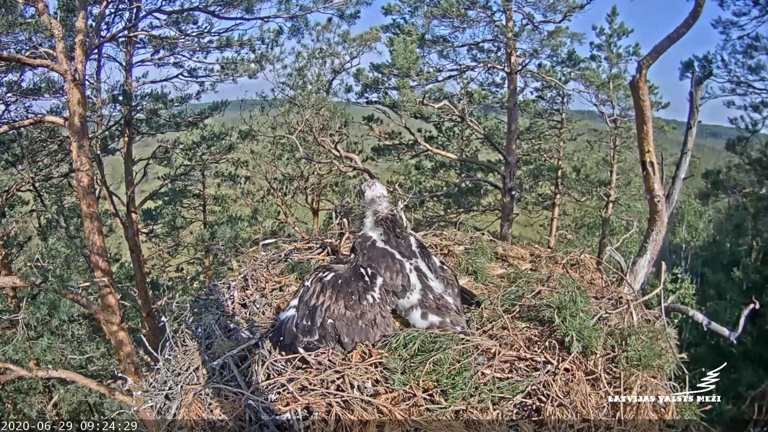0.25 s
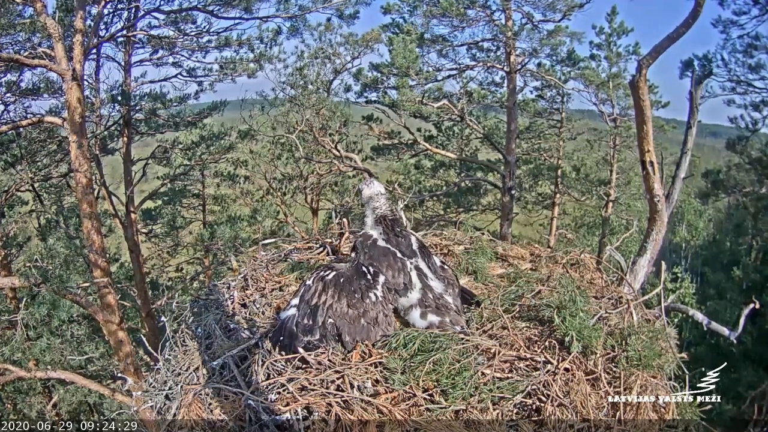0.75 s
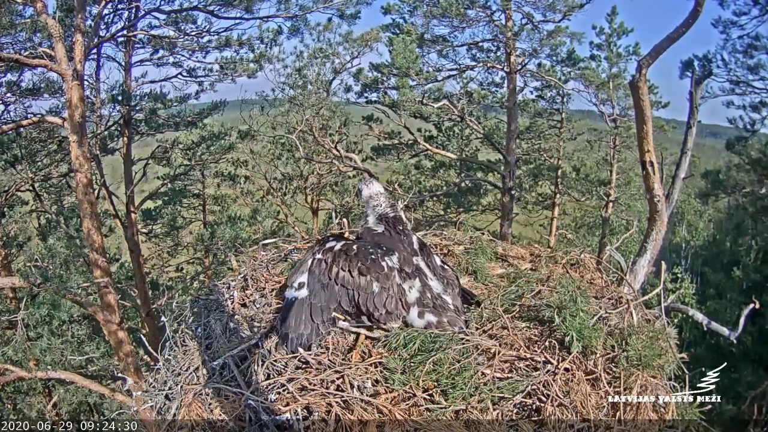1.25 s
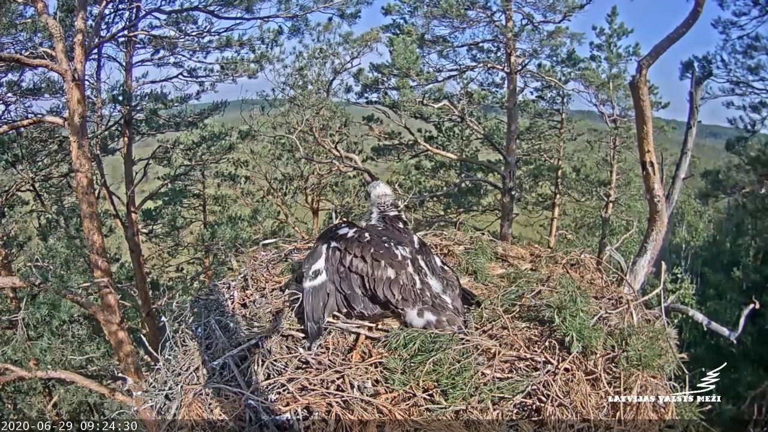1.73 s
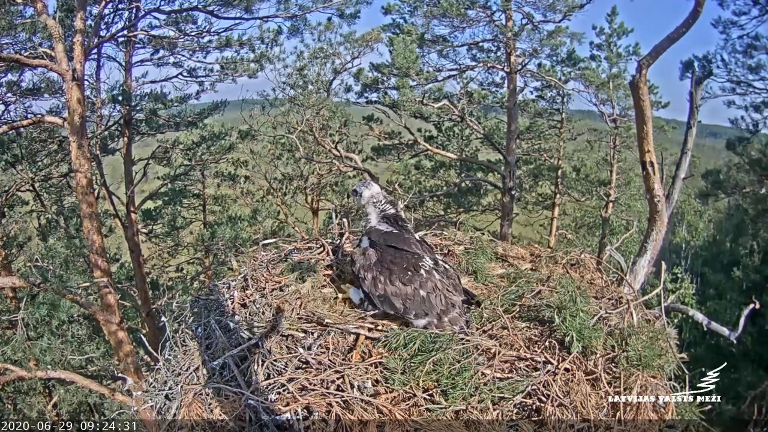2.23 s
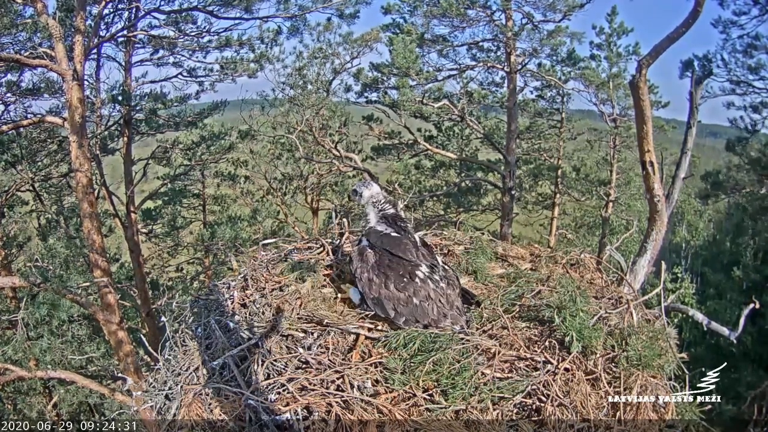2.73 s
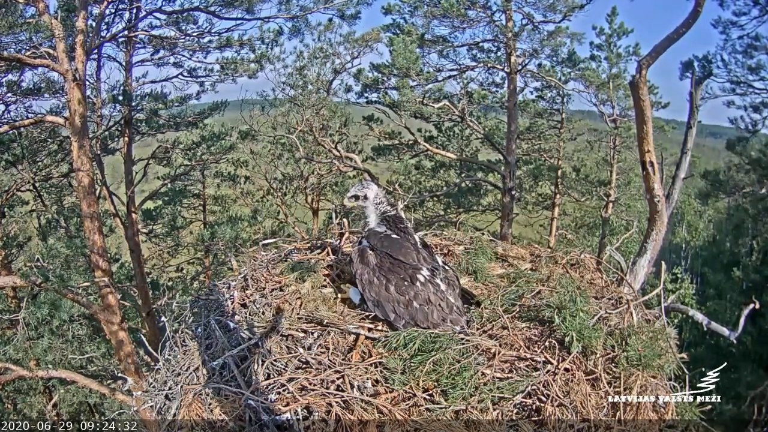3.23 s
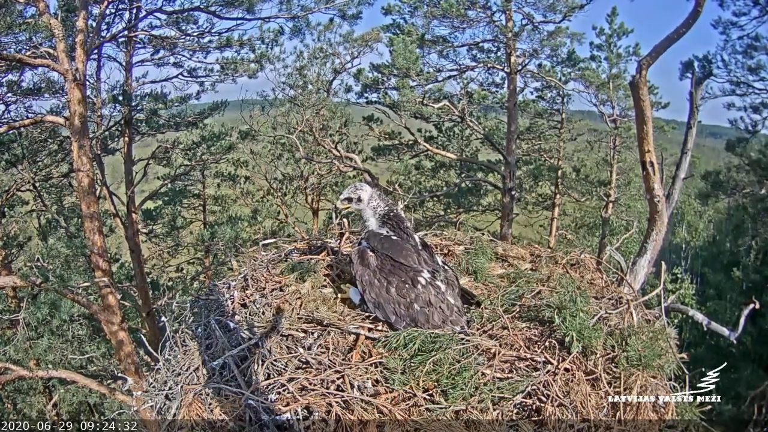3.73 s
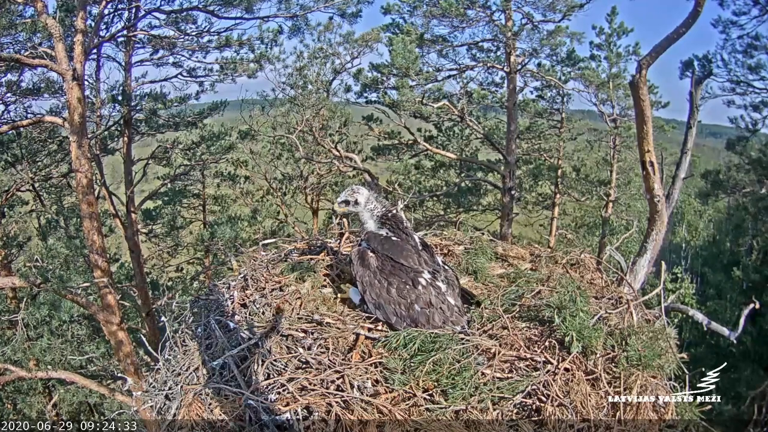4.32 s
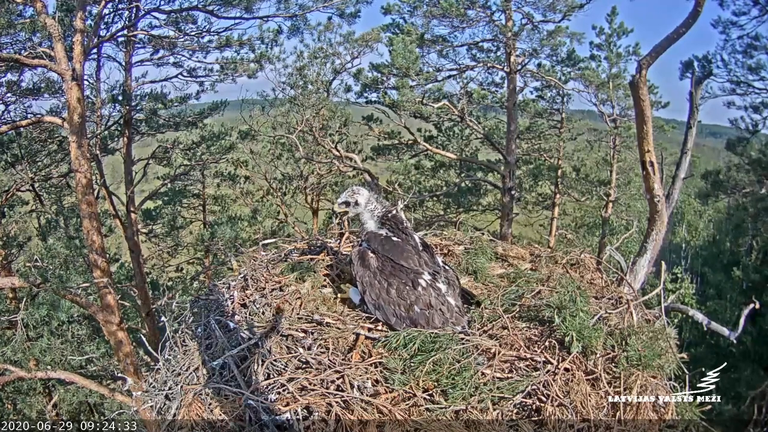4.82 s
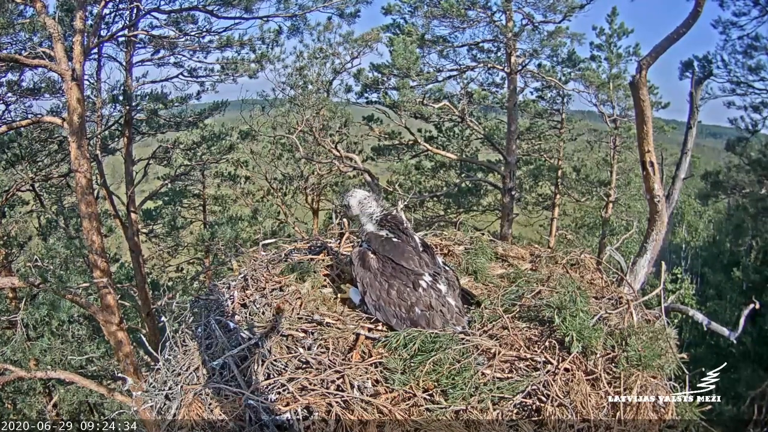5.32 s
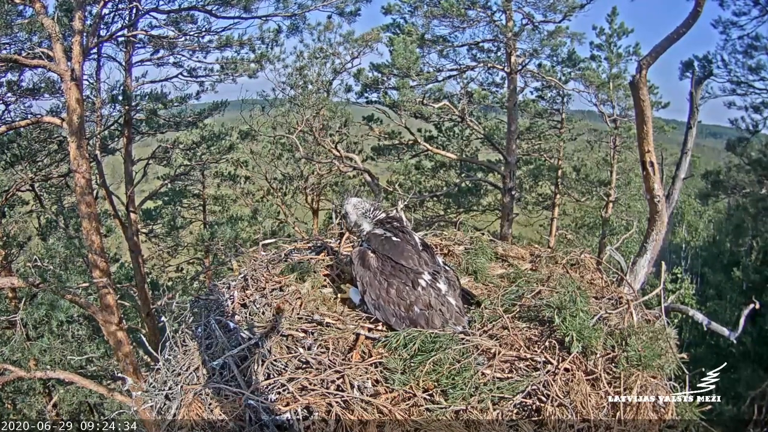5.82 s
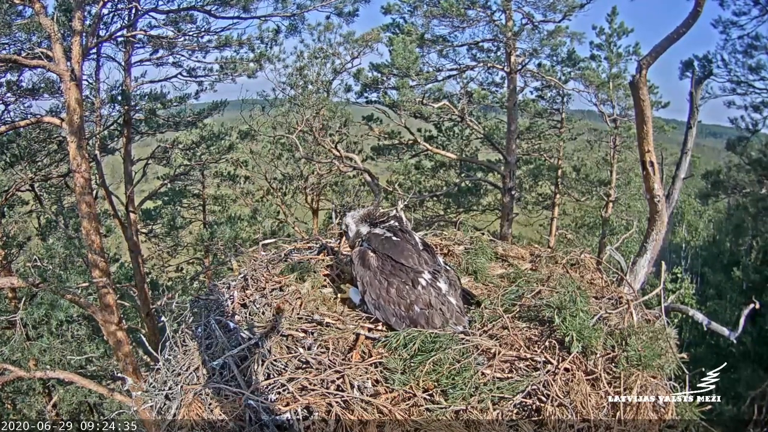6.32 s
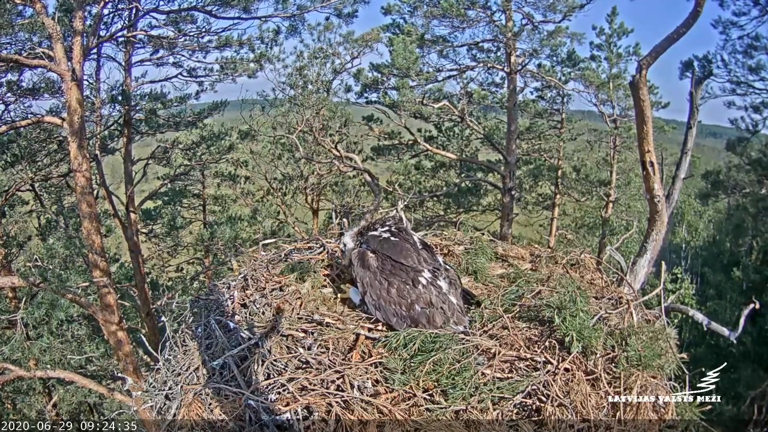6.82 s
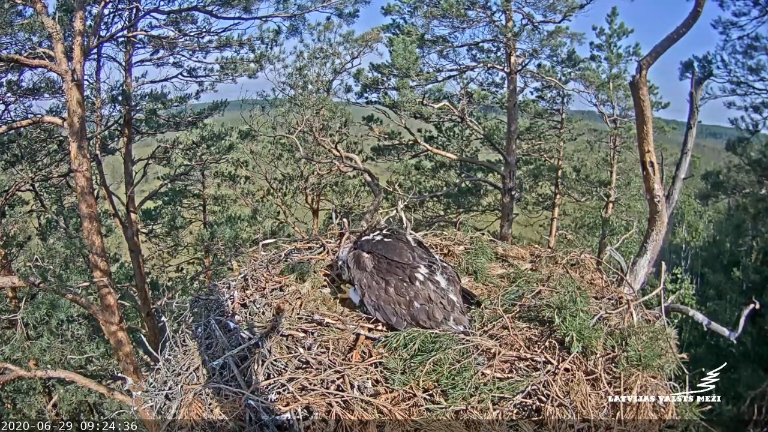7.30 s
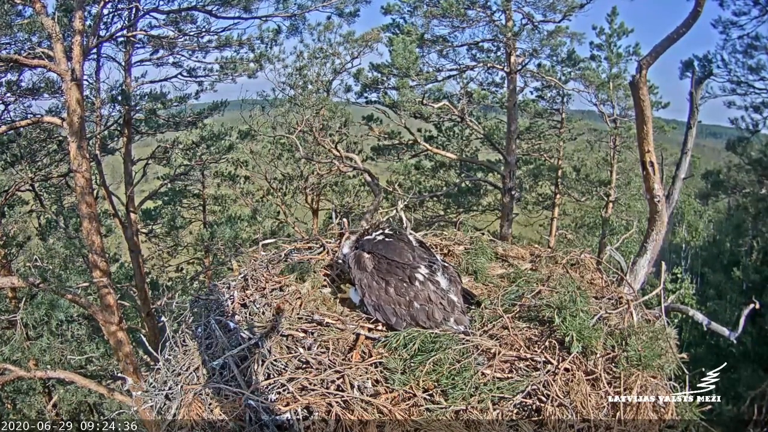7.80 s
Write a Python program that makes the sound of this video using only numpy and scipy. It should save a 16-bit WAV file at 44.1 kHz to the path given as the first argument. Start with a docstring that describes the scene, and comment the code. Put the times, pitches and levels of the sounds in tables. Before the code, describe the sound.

Steady, loud, very short eagle yelps, squeaky then hoarse, ring out close by in open woodland with light scattered echoes. Quiet repeated bird pips sound between the early calls. After the eighth call, just before six seconds, the eagle falls silent and a distant buzzy finch trill and thin falling whistles are heard over gentle wind, pine rustle and microphone hiss.

```python
"""Young eagle begging on its nest

A young eagle calls eight times on its nest in a pine forest, close to a small microphone.
Each call starts with a thin wheeze of shaped noise; all but the first then jump to a nearly pure high
note (a shaky sine). Each breaks down to a raspy lower note (a falling sine with overtones and rough noise).
The trees throw the calls back as scattered echoes. Small birds sing in gliding sines, one fairly dry and
the others blurred by echoes, over noise shaped like soft wind and microphone hiss."""
import sys
import numpy as np
from scipy import signal
from scipy.fft import rfft, irfft
from scipy.io import wavfile
from scipy.ndimage import uniform_filter1d

SR = 44100
rng = np.random.default_rng(int(sys.argv[2]) if len(sys.argv) > 2 else 0)


def generate_wav(signal):
    """Clip the signal to [-1, 1] and save it as 16-bit WAV at the path in sys.argv[1]."""
    frames = np.transpose(np.atleast_2d(signal))
    scaled = np.clip(frames, -1, 1) * 32767
    pcm = np.round(scaled).astype(np.int16)
    wavfile.write(sys.argv[1], SR, pcm)


N = 355137  # length of the scene in samples


def gain_of(db):
    """Turns decibels into an amplitude factor."""
    return 10 ** (np.asarray(db) / 20)


def evened(x):
    """Scales a signal to an average strength (rms) of 1."""
    return x / np.sqrt(np.mean(x ** 2) + 1e-20)


def read(points, hz):
    """Reads a curve over frequency, spacing the frequencies by ratio as the ear does."""
    point_hz, value = np.transpose(points)
    return np.interp(np.log(hz + 1), np.log(point_hz + 1), value)


def curves(rows):
    """Joins rows of (time, values...) by straight lines; returns sample times and each curve."""
    s, *columns = np.transpose(rows)
    t = np.arange(s[0], s[-1], 1 / SR)
    return t, *(np.interp(t, s, column) for column in columns)


def add(mix, start_s, sound):
    """Mixes a sound in at its start time."""
    part = mix[max(round(start_s * SR), 0):][:len(sound)]
    part += sound[:len(part)]


def noise(n, colour):
    """Makes noise with a given spectrum by reshaping the strength of every frequency."""
    hz = np.fft.rfftfreq(n, 1 / SR)
    spectrum = rfft(rng.standard_normal(n)) * gain_of(read(colour, hz))
    return evened(irfft(spectrum, n))


def wobble(n, hz):
    """Makes a random drift with movements up to about hz."""
    size = n + 8192
    f = np.fft.rfftfreq(size, 1 / SR)
    spectrum = rfft(rng.standard_normal(size)) / (1 + (f / hz) ** 2)
    return evened(irfft(spectrum, size))[:n]


def fade(t, edge_s):
    """Gives a note a soft start and end."""
    to_nearest_end = np.minimum(t - t[0], t[-1] - t)
    return np.sin(np.pi / 2 * np.clip(to_nearest_end / edge_s, 0, 1))


def phase_of(hz):
    """Adds up a pitch curve into the running phase of a vibration."""
    return 2 * np.pi * np.cumsum(hz) / SR


def fuzzy(hz, width_hz):
    """Air rushing through a resonance: a band of noise centred on the pitch curve hz."""
    phase = phase_of(hz)
    return evened(wobble(len(hz), width_hz) * np.cos(phase) + wobble(len(hz), width_hz) * np.sin(phase))


def eagle():
    """Each call: a wheeze, a high note (barely there in the first), then the low note, with rasp."""
    # the calls: start_s, crest_s, break_s (the voice breaks), end_s, high_hz, high_db, roughness (0-1),
    # low_hz, fall (share of the low pitch), low_db, octave_db (relative to the low note), rasp_db
    begs = [(0.051, 0.055, 0.062, .131, 2080, -31, 0.4, 1363, 0.052, -18, -4.5, -35),
            (0.846, 0.886, .899, .945, 1998, -8.5, 0.12, 1397, 0.096, -18, -10.5, -25.5),
            (1.596, 1.613, 1.624, 1.684, 1930, -18, .22, 1369, 0.048, -19, -2.5, -30.5),
            (2.325, 2.362, 2.379, 2.423, 2026, -4, 0, 1461, 0.13, -16, -14.5, -23.5),
            (3.132, 3.15, 3.183, 3.242, 2040, -9.5, 0.36, 1481, 0.14, -17, -9.5, -22.5),
            (3.981, 4.011, 4.028, 4.081, 2071, -8, 0, 1461, 0.1, -17, -10.5, -22),
            (4.802, 4.834, 4.846, 4.912, 2038, -10, 0.16, 1440, 0.11, -19, -10.5, -22),
            (5.649, 5.681, 5.692, 5.755, 2096, -15.5, .5, 1463, .105, -19.5, -12.5, -22.5)]
    # the wheeze that leads into each call: length_s, level_db, pitch_hz
    wheezes = [(0.055, -39.5, 3200), (0.14, -39.5, 3350), (0.15, -41, 3080), (.18, -39.5, 3380),
               (.173, -39.5, 3280), (.169, -40, 3150), (.166, -40, 3200), (0.1, -40, 3450)]
    # hoarse bursts in one wheeze: start_s, length_s, start_hz, end_hz, width_hz, level_db
    hoarse_bursts = [(0.717, .03, 4200, 3205, 600, -42.5), (.722, .075, 2750, 2433, 229, -37.5)]
    out = np.zeros(N)
    for call, lead in zip(begs, wheezes):
        start, crest, split, end, high_hz, high_db, rough, low_hz, fall, low_db, octave_db, rasp_db = call
        add(out, *wheeze(start, *lead))
        add(out, *high_note(start, crest, split, high_hz, high_db, rough))
        add(out, *low_note(split, end, low_hz, fall, low_db, octave_db))
        add(out, *rasp(start, split, end, rasp_db))
    for row in hoarse_bursts:
        add(out, *hoarse(*row))
    return out


OVERLAP_S = .007  # sets how far the high and low notes overlap around the break


def high_note(start, crest, split, top_hz, top_db, rough, jitter=0.058, second_db=-35, third_db=-44,
              under_db=-25, throb_hz=105, throb=0.25):
    """A nearly pure whistle that swells and throbs; pitch and strength shake when the voice is rough."""
    swell_db, break_db, handover_db = -14.5, -4, -8.5  # start and break, relative to the crest; drop after it
    scoop, scoop_s, sag_per_s = 0.037, 0.0051, 0.42  # lands from above, then sags (shares of the pitch)
    t, ease_db = curves([(start, 0), (crest, 0), (split, break_db),
                         (split + OVERLAP_S, break_db + handover_db)])
    db = top_db + ease_db + swell_db * np.maximum((crest - t) / (crest - start), 0) ** 1.36
    hz = top_hz * (1 + scoop * np.exp((start - t) / scoop_s) - sag_per_s * (t - crest))
    phase = phase_of(hz * (1 + jitter * rough * wobble(len(t), 300)))
    pulsing = np.sin(phase_of(throb_hz * (1 + 0.15 * wobble(len(t), 40))))
    shake = evened(1 + throb * pulsing + 0.55 * rough * wobble(len(t), 170))
    overtones = gain_of(second_db) * np.sin(2 * phase) + gain_of(third_db) * np.sin(3 * phase)
    # a faint undertone sounds a fifth below the high note
    under = np.sin(phase * 2 / 3)
    faint_tones = (overtones + gain_of(under_db) * under) * (1 + 0.24 * wobble(len(t), 100))
    tone = np.sin(phase) + faint_tones
    return t[0], np.sqrt(2) * gain_of(db) * shake * tone * fade(t, 0.0033)


def low_note(split, end, first_hz, fall, first_db, second_db, jitter=0.014, rough=0.031,
             octave_rough=0.32, third_db=-36, fourth_db=-42):
    """The broken voice: a tone with a shaky octave that sinks ever faster and fades as the air runs out."""
    bend, fade_db = 1.2, -10
    droop, droop_s = 0.052, .006  # its last moment droops further (share of the pitch)
    t, spent = curves([(split - OVERLAP_S / 2, 0), (end, 1)])
    hz = first_hz * (1 - fall * spent ** bend - droop * np.exp((t - end) / droop_s))
    db = first_db + fade_db * spent ** 2
    phase = phase_of(hz * (1 + jitter * wobble(len(t), 250)))
    octave_shake = evened(1 + octave_rough * wobble(len(t), 150))
    tone = np.sin(phase) + gain_of(second_db) * np.sin(2 * phase) * octave_shake
    tone += gain_of(third_db) * np.sin(3 * phase) + gain_of(fourth_db) * np.sin(4 * phase)
    shake = 1 + rough * wobble(len(t), 170)
    return t[0], np.sqrt(2) * gain_of(db) * shake * tone * fade(t, 0.014)


def rasp(start, split, end, db, flutter=0.23):
    """Chaotic vibration, made from noise, that swells around the break and rings the throat."""
    # spectrum of the rough voice: frequency_hz, level_db
    rasp_colour = [(150, -47), (520, -18), (900, -41), (1150, -48.5), (1450, -4), (1800, -2), (2100, 2),
                   (2450, -7), (2850, -5), (3200, -32), (4600, -30.5), (6200, -36), (7500, -47),
                   (14000, -48)]
    # narrow throat resonances that the rasp rings: frequency_hz, width_hz, level_db
    throat = [(3526, 68, -19.5), (4140, 57, -25.5), (6270, 67, -29)]
    t, swell_db = curves([(start - .008, -24), (start + 0.0034, -11), ((start + split) / 2, -7.5),
                          (split, 0), (end - .01, -7), (end + 0.0068, -18)])
    chaos = noise(len(t), rasp_colour)
    for hz, width_hz, ring_db in throat:
        chaos += gain_of(ring_db) * fuzzy(np.full(len(t), hz), width_hz)
    fluttering = evened(chaos * (1 + flutter * wobble(len(t), 180)))
    return t[0], gain_of(db + swell_db) * fluttering * fade(t, 0.0045)


def wheeze(end, length, top_db, top_hz, width_hz=400, upper_ratio=1.87, upper_db=-15, grain=0.11,
           lead_s=.035):
    """A thin, grainy hiss, rising and swelling as the beak opens, with a weaker upper resonance."""
    rise, swell_db = .14, -6  # climb as a share of its pitch; early level relative to the top
    start, first_db = end - length, top_db + swell_db
    t, db = curves([(start - lead_s, first_db - 13.5), (start + 0.0066, first_db),
                    (end - .035, top_db), (end, top_db)])
    hz = top_hz * (1 - rise * ((end - t) / length) ** 2)
    hiss = fuzzy(hz, width_hz) + gain_of(upper_db) * fuzzy(hz * upper_ratio, 570)
    grainy = hiss * (1 + grain * wobble(len(t), 130))
    sound = gain_of(db) * grainy * fade(t, 0.0057)
    return t[0], sound[t >= 0]  # leave out anything before the scene begins


def hoarse(start, length, first_hz, last_hz, width_hz, db, grain=0.26):
    """An abrupt, grainy rush of air that sinks in pitch."""
    t, hz = curves([(start, first_hz), (start + length, last_hz)])
    grainy = fuzzy(hz, width_hz) * (1 + grain * wobble(len(t), 130))
    return start, gain_of(db) * grainy * fade(t, 0.0052)


def chirp(length, first_hz, last_hz, db, burr, arch=0, burr_hz=380):
    """A songbird's note: a sine gliding along an arch (share of its pitch); a burr shakes it into a buzz."""
    u = np.linspace(0, 1, int(length * SR))  # 0 at the start of the note, 1 at its end
    hz = (first_hz + (last_hz - first_hz) * u) * (1 + arch * (1 - (2 * u - 1) ** 2))
    tone = np.sin(phase_of(hz + burr * burr_hz * wobble(len(u), 440)))
    return gain_of(db) * tone * (1 + 0.25 * wobble(len(u), 45)) * fade(u * length, 0.0085)


def finch_song():
    """A finch's level, buzzy notes and quick downward slurs, an even trill, then a flourish of slurs."""
    # level notes: start_s, pitch_hz, level_db (before the mix)
    notes = [(5.338, 4020, -46.5), (5.44, 5050, -50), (5.51, 3940, -43), (5.79, 4550, -47),
             (5.856, 3535, -39.5), (5.953, 4510, -46), (6.03, 3505, -40)]
    # slurs among the notes and in the closing flourish: start_s, length_s, start_hz, level_db (before the mix)
    slurs = [(5.302, 0.035, 4170, -49), (5.474, 0.049, 4400, -46.5), (5.995, 0.041, 3730, -43),
             (6.701, .065, 4700, -45.5), (6.75, 0.14, 3054, -44.5)]
    note_s, note_burr = 0.04, 0.34
    slur_end, slur_burr = .69, 0.63  # end pitch as a share of the start; burr 0-1
    # the trill repeats one steep down-sweep; its level is before the mix
    trill_s, trill_step_s, trill_count = 6.125, .0888, 6
    sweep_s, sweep_top_hz, sweep_end_hz, sweep_db, sweep_burr = 0.028, 3240, 1790, -40, 0.26
    out = np.zeros(N)
    for s, hz, db in notes:
        add(out, s, chirp(note_s, hz, hz, db, note_burr))
    for s, length, hz, db in slurs:
        add(out, s, chirp(length, hz, hz * slur_end, db, slur_burr, arch=-.04))
    for k in range(trill_count):
        sweep = chirp(sweep_s, sweep_top_hz, sweep_end_hz, sweep_db, sweep_burr, arch=0.031)
        add(out, trill_s + k * trill_step_s, sweep)
    return out


def piping_bird():
    """A songbird pipes one short arched note over and over."""
    # pips: start_s, top_hz (roughly the highest pitch), level_db
    pips = [(1.07, 2460, -41.5), (1.168, 2690, -37.5), (1.262, 2710, -40), (1.355, 2720, -40),
            (1.804, 2740, -44), (1.904, 2680, -41), (2.006, 2630, -40.5), (2.111, 2640, -36)]
    pip_s, start_share, end_share, burr = .038, 0.95, .94, .08  # end pitches as shares of top_hz; burr 0-1
    out = np.zeros(N)
    for s, hz, db in pips:
        add(out, s, chirp(pip_s, hz * start_share, hz * end_share, db, burr, arch=.05))
    return out


def whistling_bird():
    """Another songbird's gliding whistles and a row of high falling chips."""
    # whistles: start_s, length_s, start_hz, end_hz, level_db
    whistles = [(1.2, 0.065, 3750, 4250, -60.5), (1.29, .14, 4450, 4980, -62),
                (2.74, .038, 3470, 2930, -51.5), (6.15, 0.1, 4450, 3130, -49.5),
                (6.28, .056, 2780, 2210, -43.5), (6.43, 0.25, 5040, 2500, -51),
                (6.81, .21, 4400, 2540, -54), (7, 0.087, 3140, 3380, -56), (7.15, 0.22, 4450, 2445, -59),
                (7.19, .06, 2510, 3400, -53), (7.52, 0.074, 2400, 3470, -52.5),
                (7.54, 0.077, 4980, 4920, -58), (7.68, 0.28, 4700, 2450, -57),
                (7.896, 0.062, 2530, 3450, -52), (7.912, 0.0395, 2790, 2490, -41)]
    # chips: start_s, level_db
    chips = [(6.515, -54), (6.654, -50), (6.794, -50), (6.937, -50)]
    chip_s, chip_top_hz, chip_end_hz = 0.041, 5940, 4050
    out = np.zeros(N)
    for s, length, first_hz, last_hz, db in whistles:
        add(out, s, chirp(length, first_hz, last_hz, db, burr=0.078, arch=-0.0101))
    for s, db in chips:
        add(out, s, chirp(chip_s, chip_top_hz, chip_end_hz, db, burr=.25, arch=0.031))
    return out


def nest(x, spread_s=0.014):
    """Quick reflections from the sticks and the nearest branches: random echoes that soon die away."""
    t = np.arange(SR // 16) / SR
    hits = rng.random(len(t)) < 900 / SR  # about 900 echoes per second
    taps = rng.standard_normal(len(t)) * hits * np.exp(-t / spread_s) * (t > .003)
    return signal.fftconvolve(x, taps / np.linalg.norm(taps))[:N]


def forest(x, build_up_s=0.015):
    """Scattered echoes from trunks and crowns; each band dies at its own speed."""
    # echo among the trunks: frequency_hz, t60_s (time to fade by 60 dB)
    echo_times = [(500, 0.9), (1400, 0.47), (2100, 0.49), (3000, 1), (6000, 0.46)]
    taps = rng.standard_normal(SR) * (rng.random(SR) < 1500 / SR)  # about 1500 echoes per second
    hz, t, bands = signal.stft(taps, SR, nperseg=256)
    decay = gain_of(-60 * t / read(echo_times, hz)[:, None])
    bands = bands * decay * (1 - np.exp(-t / build_up_s))
    tail = signal.istft(bands, SR, nperseg=256)[1]
    return signal.fftconvolve(x, tail / np.linalg.norm(tail))[:N]


def air(level_db=-43, swell_db=1.0):
    """Low wind, far rustle of the pines and steady hiss: one shaped noise whose level drifts slightly."""
    # spectrum of wind in the pines and hiss: frequency_hz, level_db (per Hz, relative)
    air_colour = [(10, 8), (25, 1.5), (55, -4), (110, -8.5), (220, -14), (550, -20), (900, -24),
                  (1500, -23.5), (2400, -17.5), (3200, -25.5), (5000, -26.5), (8000, -31), (14000, -32)]
    return gain_of(level_db + swell_db * wobble(N, 3.9)) * noise(N, air_colour)


def scene():
    """The eagle and piping bird are fairly dry; the finch and whistling bird come scattered by branches."""
    near, finch = eagle(), finch_song()
    piper, whistler = piping_bird(), whistling_bird()
    out = near + gain_of(-15) * nest(near) + gain_of(-16) * forest(near)
    out += piper + gain_of(-15.5) * forest(piper)
    out += whistler + gain_of(-11) * nest(whistler) + gain_of(-10.5) * forest(whistler)
    out += gain_of(-1.5) * finch + gain_of(-4) * nest(finch) + gain_of(-3.0) * forest(finch)
    return (out + air())[None]


def record(dry):
    """Overload flattens the highest peaks, the sound drops out once, and the far treble is cut."""
    gap_s, gap_length_s = 1.212, .011  # middle and length of the dropout
    treble_edge_hz = 14040
    clipped = np.clip(dry, -.91, .91)
    live = abs(np.arange(N) / SR - gap_s) > gap_length_s / 2
    gate = uniform_filter1d(live * 1., size=64)  # softens the edges of the dropout
    low_pass = signal.firwin(511, treble_edge_hz, window=("kaiser", 9), fs=SR)
    return signal.oaconvolve(clipped * gate, low_pass[None], "same")


dry = scene()
out = record(dry)
generate_wav(out)
```